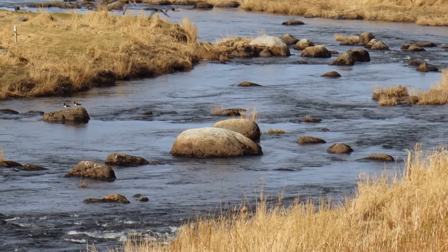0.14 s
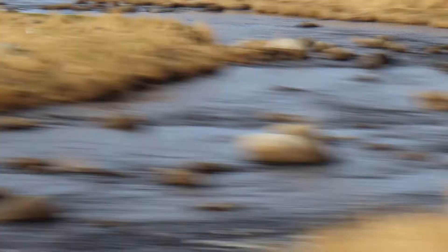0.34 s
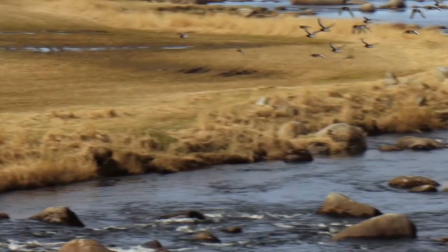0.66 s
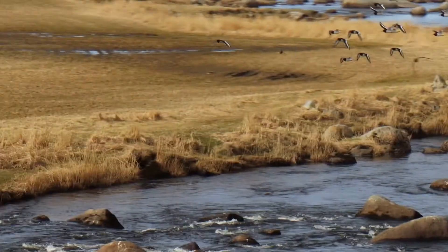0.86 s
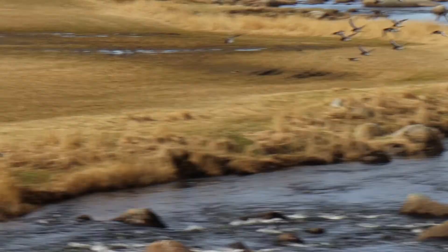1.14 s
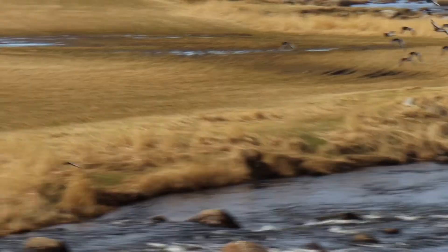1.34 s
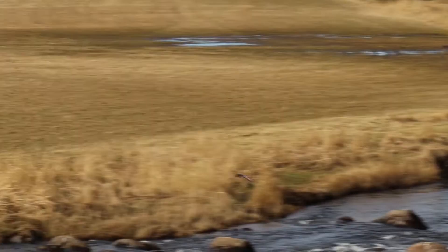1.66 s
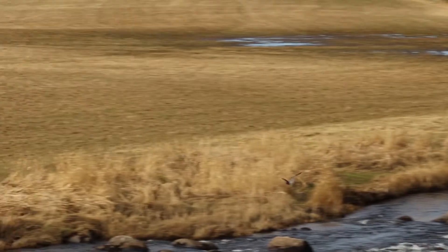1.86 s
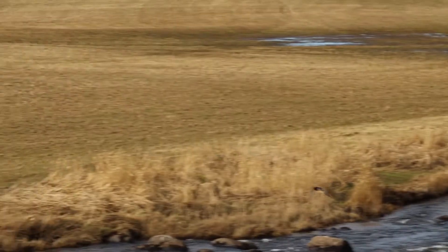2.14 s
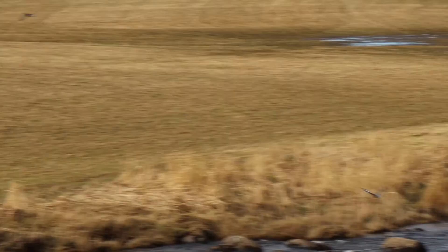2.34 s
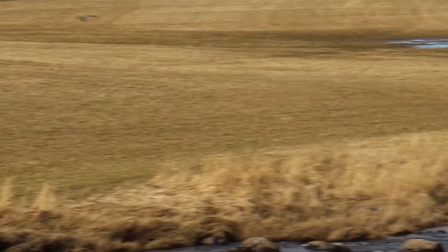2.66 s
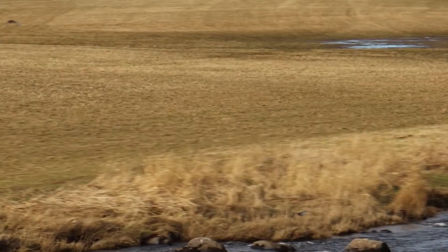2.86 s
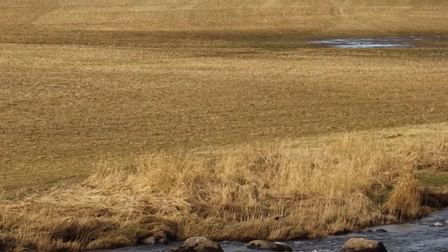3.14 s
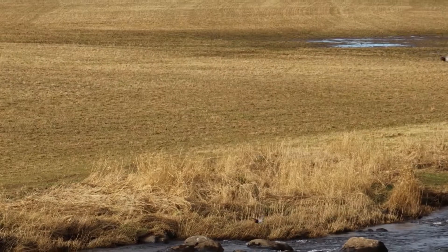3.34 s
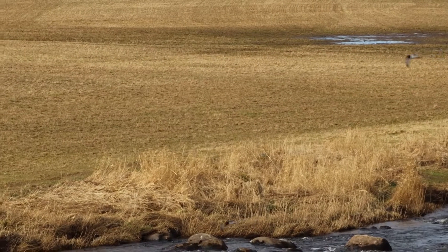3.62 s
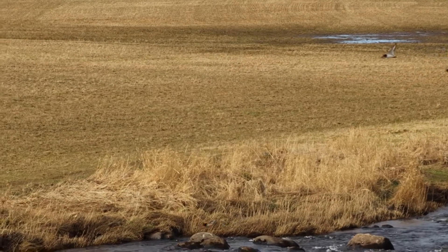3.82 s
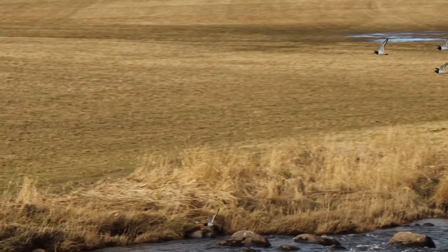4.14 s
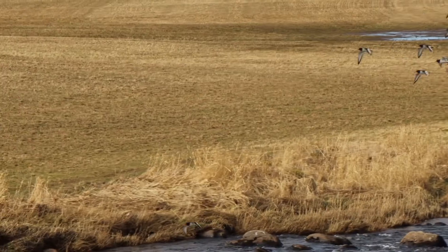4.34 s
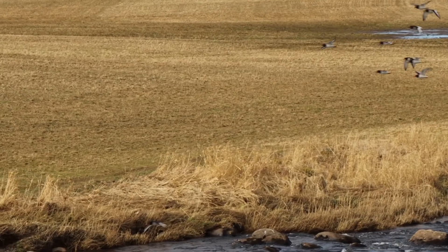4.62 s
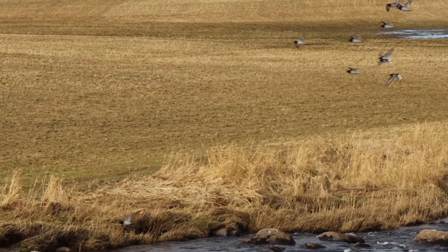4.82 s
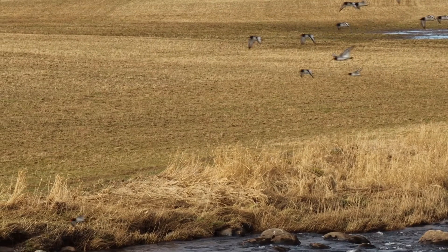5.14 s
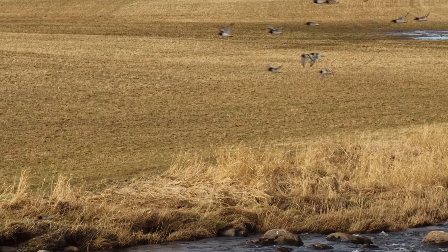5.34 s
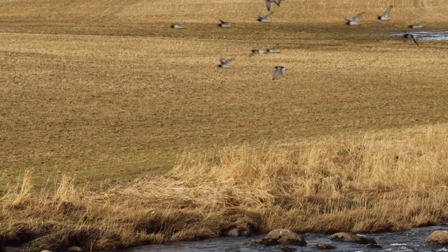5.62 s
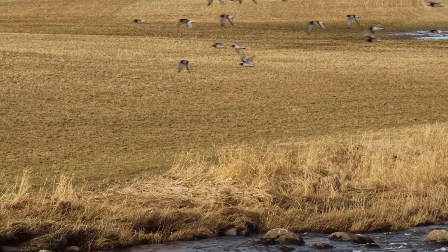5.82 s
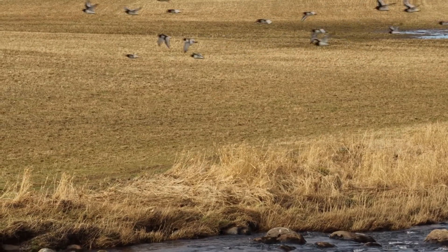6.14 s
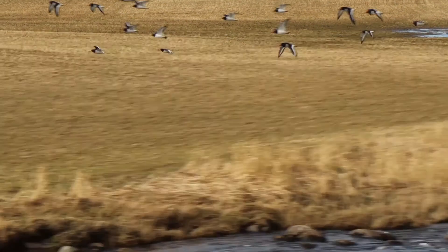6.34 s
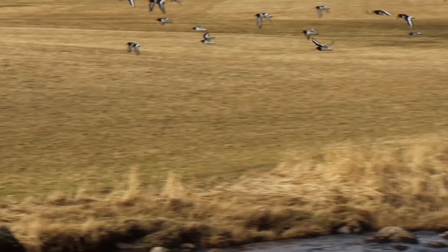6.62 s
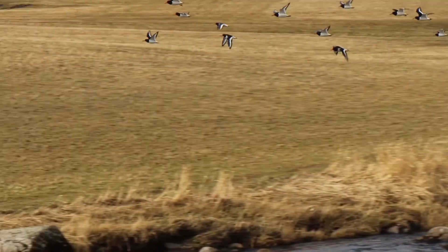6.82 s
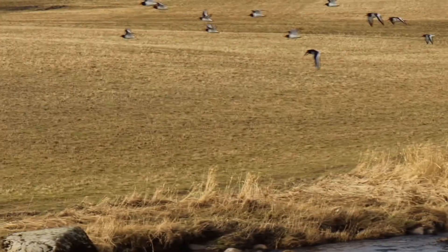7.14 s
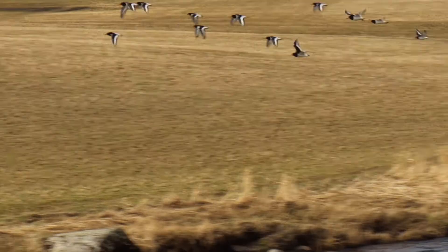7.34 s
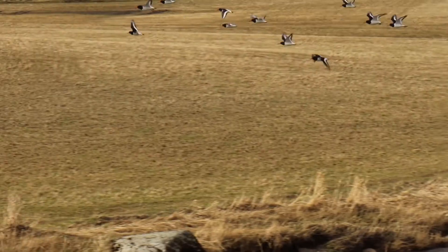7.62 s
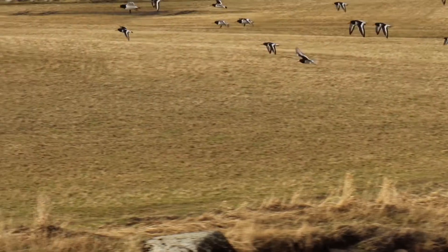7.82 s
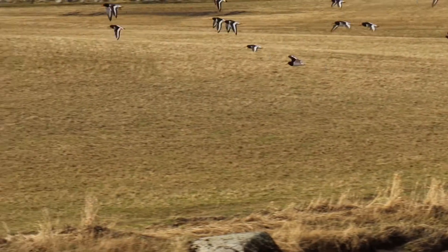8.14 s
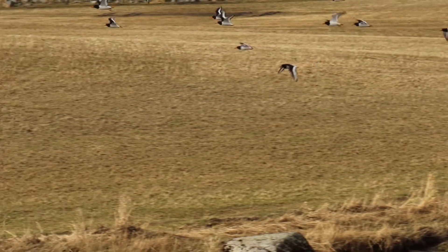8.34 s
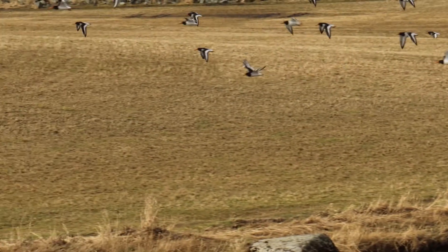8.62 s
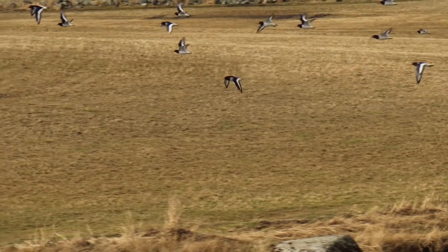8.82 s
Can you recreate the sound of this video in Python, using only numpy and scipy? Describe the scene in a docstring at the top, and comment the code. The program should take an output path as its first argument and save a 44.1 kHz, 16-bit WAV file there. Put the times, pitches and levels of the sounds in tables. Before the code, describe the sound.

A shallow river rushes evenly throughout, with small bubbles ringing in it. In the first second a thin, grainy rustle sounds close to the microphone, with one soft, hollow knock at about 0.4 seconds. From 0.3 seconds a flock of shorebirds pipes overhead, louder than the water. Each call is a high whistle up to about half a second long that scoops up, arches and drops away; some jump in pitch, and quick upward yelps mix in. The calls overlap and leave a faint, dull tail. They stop near 2.8 seconds with a brief faint rustle, resume at 3.8 and continue in clusters until the end at about 9 seconds, strongest around 5.3 to 6. Low wind gusts buffet the microphone in the first second or so, around 4, sharply at 5.3, near 7.7 and at the very end.

```python
"""A river rushes, something rustles close by, and at once a flock of oystercatchers pipes overhead.
Each call is a whistle with overtones that scoops up, arches, may jump register, and drops away.
Quick yelps mix in; the banks scatter the birds faintly. Bubbles ring in the water,
gusts buffet the microphone, and one soft knock sounds near it."""
import sys
import numpy as np
from scipy import signal
from scipy.fft import rfft, irfft
from scipy.io import wavfile
from scipy.ndimage import uniform_filter1d

SR = 44100
rng = np.random.default_rng(int(sys.argv[2]) if len(sys.argv) > 2 else 0)


def digitize_waveform(pressure):
    """Quantize a signal to 16-bit integers and store it at the path in sys.argv[1].

    Rows of a 2-D input are taken as channels; values are limited to [-1, 1].
    """
    field = np.atleast_2d(pressure).T
    bounded = np.clip(field, -1, 1)
    quanta = np.round(bounded * 32767).astype(np.int16)
    wavfile.write(sys.argv[1], SR, quanta)


N = 395577
TIME = np.arange(N) / SR

# plain calls: t/s, length/s, top f/Hz, crest/share of length, sag/share of f, level/dB,
# swell/dB, shrillness/dB
PLAIN_CALLS = [ (.29, 0.29, 1289, 0.4, 0.13, -26, -3, -7), (0.443, 0.2, 1252, 0.57, 0.14, -25.5, 2, -8),
               (0.522, .54, 1378, 0.25, 0.08, -24.5, -2, -19),
               (1.312, .115, 1291, 0.6, .05, -25.5, 1.5, -11), (1.45, 0.34, 1201, .45, 0.1, -29.5, 2.5, -6),
               (1.478, 0.38, 1369, 0.03, 0.05, -33.5, -5.5, 12.5),
               (1.488, 0.39, 1296, 0.42, 0.09, -25.5, 7, -7.5),
               (1.75, 0.42, 1371, 0.25, 0.01, -31.5, -13.5, 6),
               (1.859, 0.35, 1343, 0.11, 0.04, -18.5, 1, -11), (2.16, 0.45, 1274, .35, 0.11, -28, -5, -4.5),
               (2.161, 0.62, 1287, 0.24, 0.11, -27.5, -8.5, 4),
               (4.12, .31, 1290, 0.62, .055, -26.5, 2.5, -12),
               (4.13, .33, 1366, 0.16, 0.07, -27, 3.5, -0.5), (4.187, .23, 1328, 0.58, 0.01, -25.5, 3, 7),
               (4.69, 0.38, 1401, .38, .055, -27, 0.5, 5), (4.698, 0.46, 1358, .4, 0.1, -23, -7.5, 0.5),
               (4.859, .295, 1244, .5, 0.09, -27, -4, -2.5), (5.749, 0.37, 1366, .45, 0.05, -26, 7.5, 4.5),
               (5.755, 0.21, 1343, 0.24, 0.07, -21, -4.5, 6.5),
               (6.92, .30, 1358, 0.5, 0.06, -24.5, -3.5, 6), (6.949, 0.57, 1368, 0.09, .06, -26, 3, -8),
               (7.08, 0.38, 1317, 0.47, 0.12, -23.5, -2, -11),
               (7.338, 0.38, 1271, 0.19, 0.16, -27.5, -2.5, -17.5),
               (7.714, 0.19, 1034, 0.21, 0.04, -25, -6, -11.5),
               (7.966, 0.59, 1274, 0.24, 0.08, -30, 2, -11), (8.06, 0.15, 1292, 0.58, 0.01, -28.5, -7, 2.5),
               (8.56, 0.28, 1219, .3, 0.15, -26.5, -4, -5.5), (8.621, 0.34, 1229, 0.33, 0.04, -26.5, 2, -2),
               (8.73, 0.21, 1262, 0.8, .03, -29.5, 0.5, -7), ]
# calls that change register: same columns, then jump up after/s (0: starts high), break down after/s
YODEL_CALLS = [ (.33, .53, 1266, .35, 0.18, -25.5, -1.5, -7.5, 0, .4),
               (.83, 0.43, 1359, 0.3, .165, -25.5, -10, -3, 0.00073, .41),
               (2.43, 0.33, 1510, 0.24, 0.14, -28.5, 1.5, -1.5, 0.076, 0.17),
               (3.785, 0.35, 1226, .24, .115, -28, -0.5, -6, 0, .273),
               (4.69, 0.38, 1171, .3, 0.13, -24.5, 0, -4, .04, .26),
               (5.325, .315, 1524, 0.35, 0.082, -21, 6, -10, .15, .253),
               (5.43, .67, 1535, .34, .135, -24, 6.5, -11, .133, .318),
               (6.585, 0.24, 1515, 0.36, 0.073, -27.5, 7, -3, 0.095, 0.22), ]


def undb(db):
    """Decibels to gain."""
    return 10 ** (np.asarray(db) / 20)


def curve(rows, t):
    """Straight lines through (t/s, value) rows."""
    return np.interp(t, *np.transpose(rows))


def gain_at(spectrum, hz):
    """Gain of a (f/Hz, level/dB) spectrum at hz."""
    f, db = np.transpose(spectrum)
    return undb(np.interp(np.log(hz + 1), np.log(f), db))


def colour(x, spectrum):
    """Filter by a (f/Hz, level/dB) spectrum."""
    return irfft(rfft(x) * gain_at(spectrum, np.fft.rfftfreq(N, 1 / SR)), N)


def noise(spectrum):
    """Coloured noise, rms 1."""
    x = colour(rng.standard_normal(N), spectrum)
    return x / x.std()


def walk(rate_hz, size=N):
    """Smooth random drift of order 1."""
    step = max(int(SR / rate_hz), 2)
    knots = rng.standard_normal(size // step + 3)
    position = np.arange(size) / step + rng.random()
    return uniform_filter1d(np.interp(position, np.arange(len(knots)), knots), step // 2)


def samples(begin_s, end_s):
    """Sample indices of a time span."""
    return np.arange(max(int(begin_s * SR), 0), min(int(end_s * SR), N))


def river(level_db=-35, surge_db=.5, gurgle_db=-12, cycles=9, count=2500):
    """Shallow water over stones: an even rush with small bubbles ringing in it."""
    # water spectrum: f/Hz, level/dB
    rush = [(59, -24), (100, -21), (172, -1.5), (883, 2.5), (970, -1), (1190, 0), (1340, -7), (2060, -14.5),
            (2730, -18.5), (4970, -32), (7950, -40), (8900, -61), (11600, -83.5), (19600, -120)]
    # stereo width: f/Hz, side minus mid/dB
    width = [(100, -18), (400, -15.5), (1000, -14.5), (2500, -2), (6000, 5)]
    bubbles = np.zeros(N + SR)
    for when, pitch, size in rng.random((count, 3)):
        hz = 300 * 2 ** (3 * pitch)
        age_cycles = np.arange(int(2 * cycles * SR / hz)) * hz / SR
        ring = np.sin(2 * np.pi * age_cycles * (1 + .0055 * age_cycles))
        ring *= np.exp(-2 * age_cycles / cycles)
        bubbles[int(when * N):][:len(ring)] += size ** 3 * gain_at(rush, hz) * ring
    mid = noise(rush) + undb(gurgle_db) * bubbles[:N] / bubbles.std()
    side = colour(noise(rush), width)
    return undb(level_db + surge_db * walk(1.2)) * np.array([mid + side, mid - side])


def wind(breeze_db=-52, eddy_db=5, side_gain=.79, lean_db=2, hard_db=-25, burble_db=-6):
    """Eddies thump on the two microphone ports, partly unrelated, harder on the left."""
    # gusts: t/s, level/dB, half width/s
    gust_peaks = [(0.304, -27.5, 0.1), (0.826, -35.5, 0.27), (1.127, -31.5, 0.2), (2.348, -46.5, 0.1),
                  (3.328, -38.5, 0.064), (3.878, -37.5, 0.46), (4.945, -37, 0.032), (5.26, -21, 0.065),
                  (7.552, -33.5, 0.084), (7.767, -31.5, 0.23), (8.96, -31, 0.054)]
    # eddy pressure spectrum: f/Hz, level/dB
    buffet = [(20, -22), (48, 7.5), (105, 4.5), (220, -15), (400, -33), (1500, -87)]
    gusts = sum(undb(db) * np.exp(-((TIME - at_s) / half_s) ** 2) for at_s, db, half_s in gust_peaks)
    force = (gusts + undb(breeze_db + eddy_db * walk(1.7))) * undb(eddy_db * walk(35))
    # hard gusts shed smaller eddies, an octave up
    small_eddies = [(2 * hz, db) for hz, db in buffet]
    burble = undb(burble_db) * np.minimum(gusts / undb(hard_db), 1)
    mid, side = (noise(buffet) + burble * noise(small_eddies) for _ in range(2))
    ports = np.array([mid + side_gain * side, mid - side_gain * side])
    return force * ports * undb([[lean_db], [-lean_db]])


def rustle(grain_db=2):
    """A thin, grainy hiss close to the microphone."""
    # rustle envelope: t/s, level/dB
    levels = [(0, -52.5), (.3, -46.5), (.6, -46), (1.2, -74), (2.5, -72.5), (2.77, -46.5), (2.83, -64)]
    hiss = [(1500, -1), (3500, 10), (6000, 1.5), (7800, 6), (9500, -8.5)]  # f/Hz, level/dB
    return np.array([noise(hiss), noise(hiss)]) * undb(curve(levels, TIME) + grain_db * walk(80))


def whistle(span, hz, envelope, shrill_db, wander=.00301, waver=.003, jitter=.0018, rasp=.034,
            glide_db=-2, glide_dull_db=-7, flutter_db=2.5, fading_db=4, press_db=9, spread_ms=.018):
    """One bird's voice: six harmonics through throat and bill."""
    # throat and bill resonances: f/Hz, level/dB
    throat = [(700, -19), (950, -4.5), (1150, -1), (1330, 0), (1520, -2.5), (1700, -13), (1900, -8),
              (2070, -7.5), (2300, -18), (2700, -15), (3150, -19.5), (3700, -29.5), (4060, -24),
              (4500, -26.5), (5300, -32), (8200, -49.5)]
    # flock bearing: t/s, right port lag/ms
    bearing = [(1.8, .067), (2.1, .015), (4.3, 0), (4.7, .07), (5.6, -.035), (6.7, .028)]
    size = len(span)
    hz = uniform_filter1d(hz, size=300)
    # fast glides are raspy, softer and duller
    glide_per_s = np.gradient(np.log(hz)) * SR
    gliding = uniform_filter1d(np.tanh(glide_per_s / 2) ** 2, size=500)
    drift = wander * walk(13.95, size) + waver * walk(45.1, size)
    hz = hz * (1 + drift + (jitter + rasp * gliding) * walk(500, size))
    phase = 2 * np.pi * np.cumsum(hz) / SR
    loudness = envelope * undb(glide_db * gliding + flutter_db * walk(29.3, size))
    # pressed hardest, so shrillest, in mid-call
    press = np.sin(np.pi * np.arange(size) / size)
    edge_db = shrill_db + press_db * (press - press.mean()) + glide_dull_db * gliding
    # each bird has its own place in the flock
    lag_s = (curve(bearing, span[0] / SR) + spread_ms * rng.standard_normal()) / 1000
    port_phase = phase + np.array([[1], [-1]]) * np.pi * hz * lag_s
    out = np.zeros((2, N))
    for k in range(1, 7):
        # overtones beam from the bill and fade as the bird turns
        beam = undb(min((k - 1) / 3, 1) * (edge_db + fading_db * walk(12, size)))
        out[:, span] += np.sqrt(2) * loudness * beam * gain_at(throat, k * hz) * np.sin(k * port_phase)
    return out


def arch(t, length_s, crest, sag, rise=.055):
    """Pitch ratio along a call: a rise to the crest, then a sag."""
    crest_s = np.clip(crest, .05, .95) * length_s
    to_climb = np.clip(1 - t / crest_s, 0, 1)
    sagging = np.clip((t - crest_s) / (length_s - crest_s), 0, 1)
    return 1 - rise * to_climb ** 2.113 - sag * sagging ** 1.65


def syrinx(t, scoop, drop, slack=.68, slide=.6, snap_s=.01998):
    """Pitch ratio from tension: slides up from slack, snaps to pitch, slackens in the drop."""
    snap = np.clip(1 + t / snap_s, 0, 1)
    tension = (slide * scoop + (1 - slide) * snap) * (1 - drop ** 1.4)
    return slack + (1 - slack) * tension


def register(t, up_s, down_s, before_jump=.86, after_break=.905):
    """Pitch ratio as the voice flips up and back down."""
    steps = np.where((t < up_s) & (up_s > 0), before_jump, 1.) * np.where(t > down_s, after_break, 1.)
    return uniform_filter1d(steps, size=600)


def call(start_s, length_s, top_hz, crest, sag, level_db, swell_db, shrill_db, up_s=0, down_s=np.inf,
         scoop_s=.08, drop_s=.05):
    """A piping call: fades in over the scoop, swells or wanes along the arch, dies in the drop."""
    span = samples(start_s - scoop_s, start_s + length_s + drop_s)
    t = span / SR - start_s
    scoop = np.clip(1 + t / scoop_s, 0, 1)
    drop = np.clip((t - length_s) / drop_s, 0, 1)
    hz = top_hz * arch(t, length_s, crest, sag) * syrinx(t, scoop, drop) * register(t, up_s, down_s)
    gain = undb(level_db + swell_db * np.linspace(-.5, .5, len(span)))
    return whistle(span, hz, gain * scoop ** .8 * (1 - drop) ** .46, shrill_db)


def banks(x, t60_s=2.3, build_s=.042, wet_db=-10, lowpass_hz=1900):
    """Grass and river banks scatter a faint, dull tail."""
    t = TIME[:3 * SR]
    envelope = np.exp(-np.log(1000) * t / t60_s) * (1 - np.exp(-t / build_s))
    tail = rng.standard_normal((2, len(t))) * envelope
    tail /= np.sqrt(np.sum(tail ** 2, axis=1, keepdims=True))
    tail = signal.sosfilt(signal.butter(2, lowpass_hz, fs=SR, output="sos"), tail)
    return undb(wet_db) * signal.fftconvolve(x, tail, axes=1)[:, :N]


def yelp(end_s, top_hz, level_db, length_s=.055, low_hz=800, shrill_db=-2):
    """A hoarse upward flick that breaks off at its top."""
    span = samples(end_s - length_s, end_s)
    progress = np.linspace(0, 1, len(span))
    hz = low_hz + (top_hz - low_hz) * progress ** 1.4
    envelope = undb(level_db) * np.sqrt(np.abs(np.sin(np.pi * progress)))
    return whistle(span, hz, envelope, shrill_db)


def far_birds(level_db=-33, top_hz=1200):
    """Farther birds answer each call with a faint yelp."""
    ends_s = [start_s + rng.random() * length_s for start_s, length_s, *_ in PLAIN_CALLS + YODEL_CALLS]
    return sum(yelp(min(end_s, N / SR), top_hz, level_db) for end_s in ends_s)


def knock(contact_s=.0035):
    """A soft, hollow knock near the microphone: two damped modes."""
    # impact: t/s, level/dB
    impacts = [(0.425, -4)]
    # hollow resonances: f/Hz, level/dB, t60/s
    modes = [(467, -3.5, 0.046), (311, -8, 0.07)]
    out = np.zeros(N)
    for at_s, level_db in impacts:
        age_s = np.clip(TIME - at_s, 0, .5)
        for hz, mode_db, t60_s in modes:
            ring = np.sin(2 * np.pi * hz * age_s) * np.exp(-np.log(1000) * age_s / t60_s)
            out += undb(level_db + mode_db) * ring * np.minimum(age_s / contact_s, 1)
    return out


def scene(lean_db=.5):
    """The flock, slightly left, over river, wind, rustle and knock."""
    # upward yelps: end t/s, top f/Hz, level/dB
    yelps = [(.325, 1225, -24.5), (.45, 1295, -25.5), (1.85, 1142, -22), (2.165, 1310, -20.5),
             (3.869, 1300, -24.5), (4.565, 1150, -33), (5.911, 1250, -30.5), (6.797, 1375, -21),
             (7.08, 1202, -26.5), (8.53, 1290, -26)]
    calls = sum(call(*row) for row in PLAIN_CALLS + YODEL_CALLS)
    birds = calls + sum(yelp(*row) for row in yelps) + far_birds()
    flock = birds * undb([[lean_db], [-lean_db]])
    return flock + banks(flock) + river() + wind() + rustle() + knock()


def record(dry, cutoff_hz=8950):
    """The recorder cuts the treble steeply."""
    return signal.sosfilt(signal.ellip(10, .2, 80, cutoff_hz, fs=SR, output="sos"), dry)


dry = scene()
out = record(dry)
digitize_waveform(out)
```